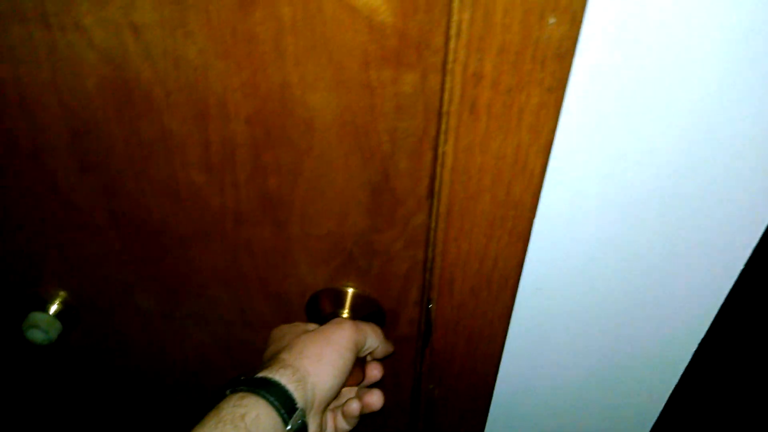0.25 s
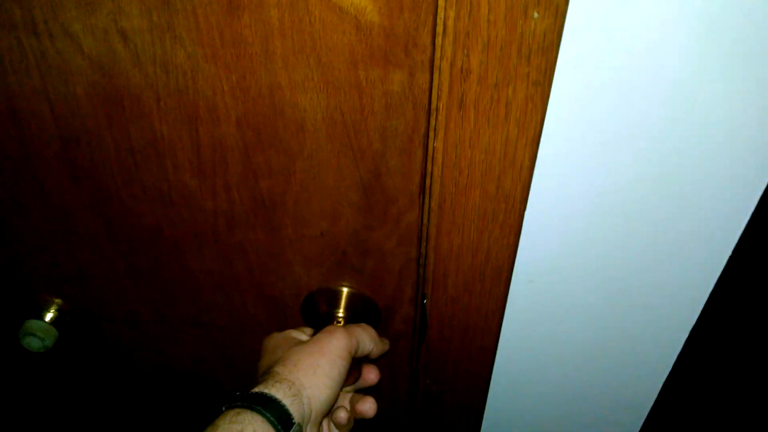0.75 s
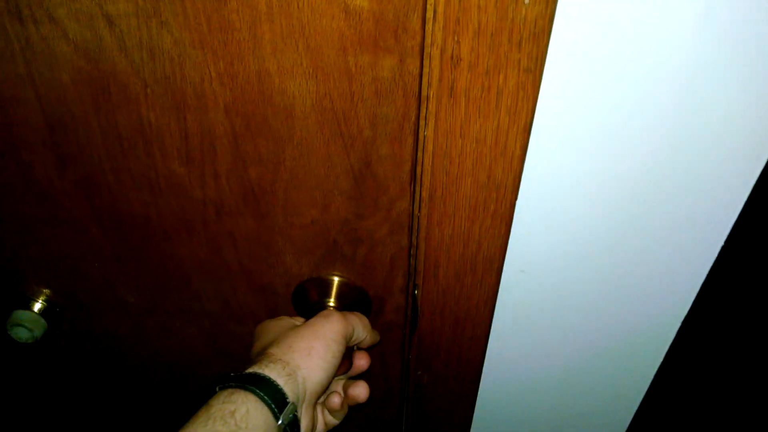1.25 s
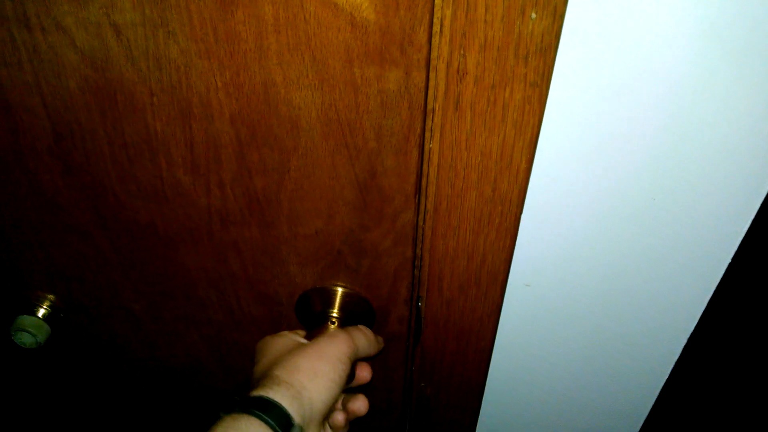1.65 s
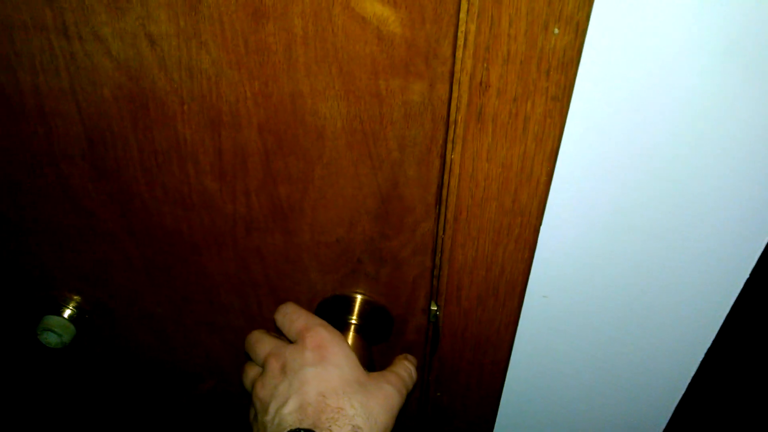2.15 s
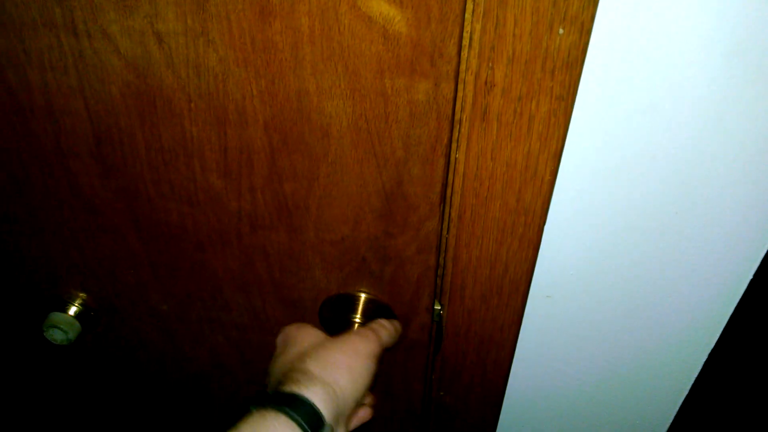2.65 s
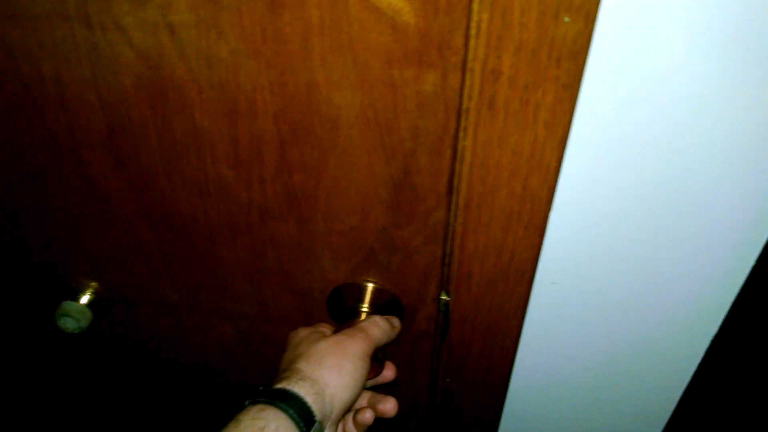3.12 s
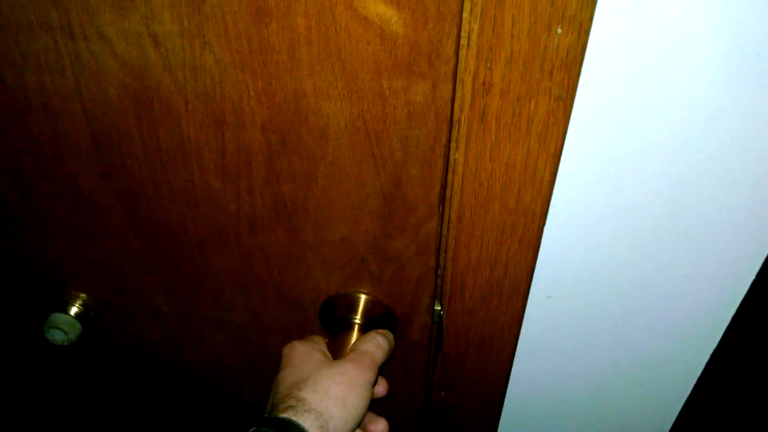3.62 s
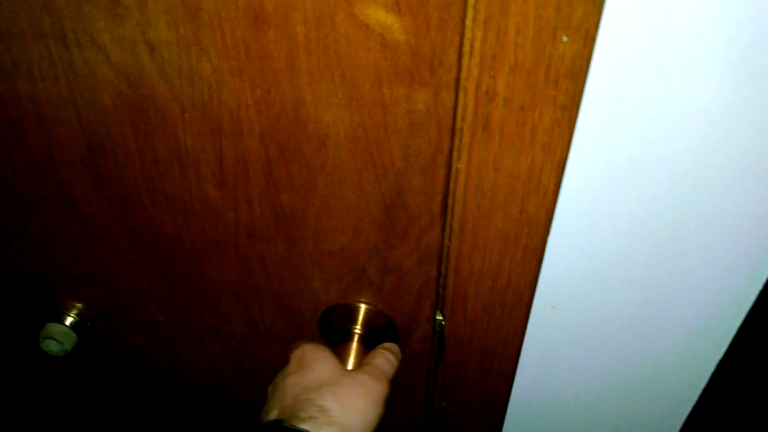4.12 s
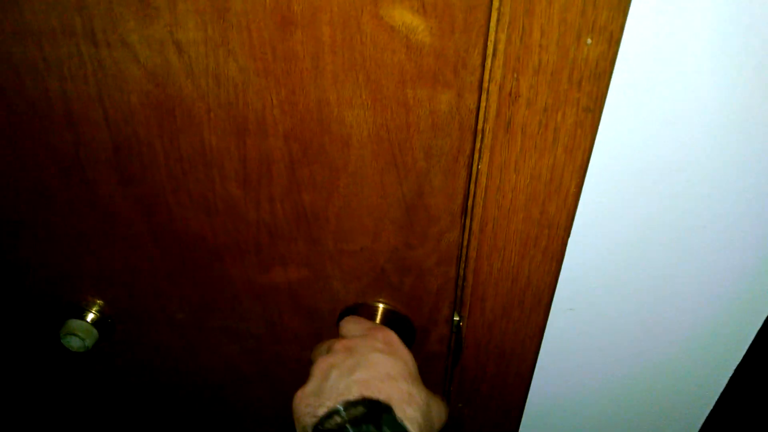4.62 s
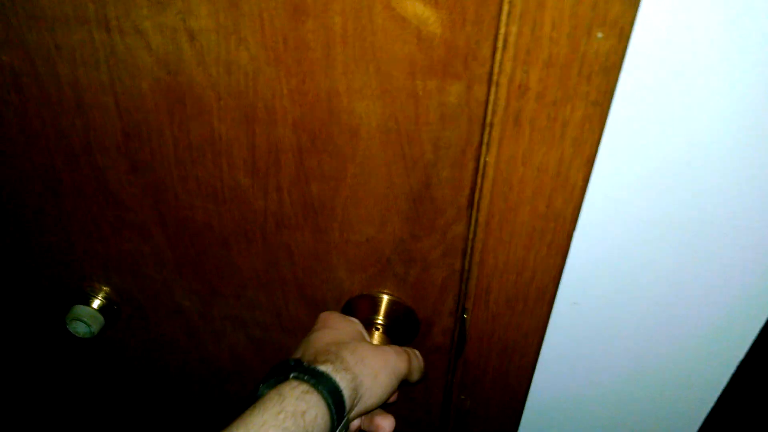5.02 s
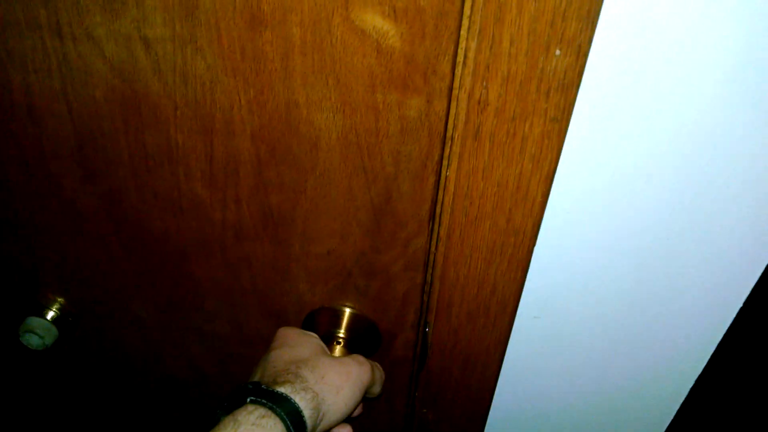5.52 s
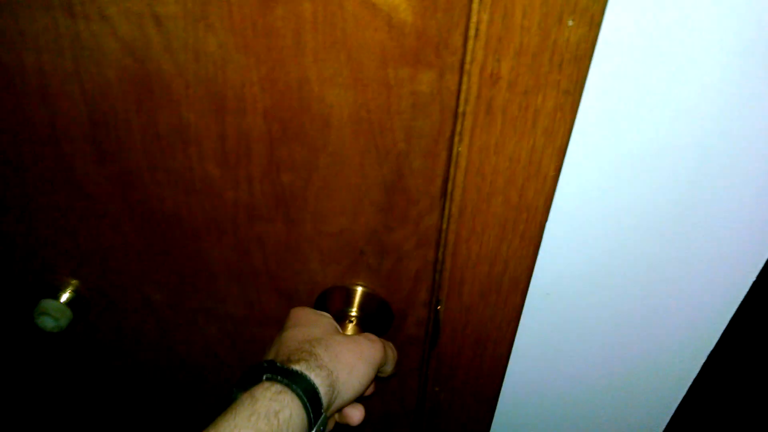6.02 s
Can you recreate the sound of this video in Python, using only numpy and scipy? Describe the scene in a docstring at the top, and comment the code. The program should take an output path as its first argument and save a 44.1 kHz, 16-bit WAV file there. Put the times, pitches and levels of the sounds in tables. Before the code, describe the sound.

A nearby stereo microphone picks up a brass doorknob being turned and pulled. The lock case clacks, the bolt snaps brightly, the loose knob rattles and the wooden door thuds hollowly in its frame. Sparse early contacts lead to a crowded flurry in the middle, then a quieter gap and final heavy tugs. Faint skin rubbing and soft room rumble fill the pauses.

```python
"""A low room rumble and microphone hiss, then a hand twists a brass knob and tugs at a stuck wooden door.
Rumble, hiss and skin are shaped stereo noise. Lone ticks sound the knob only; every other contact mixes
leaf, veneer, lock case, bolt and knob: filtered blows with echoes and chatter, plus decaying sine modes.
Tugs also drive the bolt onto the strike plate, and the latch spring twangs as decaying sines."""
import sys
import numpy as np
from scipy import signal
from scipy.fft import rfft, irfft, next_fast_len
from scipy.io import wavfile
from scipy.ndimage import map_coordinates

SR = 44100
rng = np.random.default_rng(int(sys.argv[2]) if len(sys.argv) > 2 else 0)


def to_wav(sig):
    """Store sig (one row per channel, or 1-D mono) as 16-bit WAV at the path in sys.argv[1].

    Samples outside -1..1 are clipped; the rate is SR.
    """
    pcm = np.clip(np.atleast_2d(sig), -1, 1) * 32767
    pcm = np.round(pcm).astype(np.int16)
    wavfile.write(sys.argv[1], SR, pcm.T)  # frames by channels


N = 276506  # samples in the scene
T_S = np.arange(int(.5 * SR)) / SR  # time axis of one contact
ONSET = int(.02 * SR)  # samples in the onset of a blow


def amp(db):
    """Decibels to amplitude."""
    return 10 ** (np.asarray(db) / 20)


def unit(x):
    """Scale to rms 1."""
    return x / np.sqrt(np.mean(x ** 2) + 1e-20)


def struck(x):
    """Scale a blow to rms 1 over its onset."""
    return x / np.sqrt(np.mean(x[..., :ONSET] ** 2) + 1e-20)


def along(points, hz):
    """Interpolate (Hz, value) points on a log frequency axis."""
    point_hz, values = np.transpose(points)
    return np.interp(np.log(hz + 1), np.log(point_hz + 1), values)


def wobble(rate_hz):
    """Smooth random curve with rate_hz knots a second."""
    knots = rng.standard_normal(int(N * rate_hz / SR) + 4)
    return map_coordinates(knots, [np.arange(N) * rate_hz / SR])


def filtered(x, response):
    """Multiply the zero-padded spectrum of x by a response of frequency."""
    n = x.shape[-1]
    m = 2 * next_fast_len(n // 2 + 4096)
    return irfft(rfft(x, m) * response(np.fft.rfftfreq(m, 1 / SR)), m)[..., :n]


def body(spectrum):
    """Minimum-phase response with this magnitude, by folding the cepstrum."""
    def response(hz):
        cepstrum = irfft(np.log(amp(along(spectrum, hz))))
        half = len(cepstrum) // 2
        folded = np.r_[cepstrum[0], 2 * cepstrum[1:half]]
        return np.exp(rfft(folded, 2 * half))
    return response


def resonances(modes):
    """Sum of second-order band-pass resonances with alternating signs."""
    def response(hz):
        total = 0
        for k, (centre_hz, width_hz, db) in enumerate(modes):
            loss = 1j * hz * width_hz
            total = total + (-1) ** k * amp(db) * loss / (centre_hz ** 2 - hz ** 2 + loss)
        return total
    return response


# stereo width: (frequency [Hz], side minus mid [dB], before apart_db)
STEREO_WIDTH = [(25, -5.5), (75, 3.5), (150, -5.5), (300, -7.5), (600, -10.5), (2000, -17), (10000, -6)]


def pair(count, apart_db):
    """Stereo noise whose side-to-mid ratio varies with frequency."""
    mid, side = rng.standard_normal((2, count))
    side = filtered(side, lambda hz: amp(along(STEREO_WIDTH, hz) + apart_db))
    return unit(np.array([mid + side, mid - side]))


def ringing(modes, spread_db):
    """Decaying sine modes with random strength, sign, slight detuning and slight channel imbalance."""
    hz, db, t60_s = np.transpose(modes)[:, :, None]
    hz = hz * (1 + .011 * rng.standard_normal(hz.shape))  # the grip detunes them
    strength_db = db + spread_db * rng.standard_normal(hz.shape)
    level_db = strength_db + 0.4 * rng.standard_normal((2, len(hz), 1))
    signs = rng.choice([-1, 1], hz.shape)
    waves = signs * amp(-60 * T_S / t60_s) * np.sin(2 * np.pi * hz * T_S)
    attack = 1 - np.exp(-T_S * hz.min())
    ring = amp(level_db[..., 0]) @ waves * attack
    return ring / np.sqrt(np.mean(ring[:, :3 * ONSET] ** 2))


def add(track, s, sound):
    """Mix a sound in at time s."""
    start = round(s * SR)
    track[:, start:start + len(T_S)] += sound[:, :max(N - start, 0)]


# floor noise: (frequency [Hz], relative level [dB])
FLOOR_SPECTRUM = [(20, -6), (50, -3), (78, 0.5), (112, -13.5), (160, -3), (330, -6.5), (600, -11),
                  (1000, -21), (1700, -26.5), (3000, -31), (7000, -31.5), (11000, -31), (14500, -26.5),
                  (15500, -32)]
# room standing waves: (frequency [Hz], width [Hz], relative level [dB])
ROOM_MODES = [(69.4, 12.6, 1), (154, 9.2, 2), (173, 5.5, 4), (216.4, 3.8, -13.5), (315, 29, -4),
              (377.7, 23, -1.5)]
# rumble swell, taken relative to its median: (time [s], level [dB])
RUMBLE_SWELL = [(0.0, -49), (0.77, -53.5), (4.8, -48.5), (4.98, -52.5), (6.13, -49.5), (6.27, -53)]


def background():
    """Wavering rumble coloured by the room's standing waves, under steady microphone hiss."""
    floor = amp(-47.0) * unit(filtered(pair(N, apart_db=3), body(FLOOR_SPECTRUM)))
    rumble = filtered(floor, lambda hz: 1 / (1 + (hz / 1200) ** 4))
    hiss = floor - rumble
    drone = amp(-54.5) * unit(filtered(pair(N, apart_db=2.0), resonances(ROOM_MODES)))
    s, db = np.transpose(RUMBLE_SWELL)
    swell_db = np.interp(np.arange(N) / SR, s, db - np.median(db)) + 0.54 * wobble(6.1)
    return amp(swell_db) * (rumble + drone) + hiss


# first echoes: (delay [s], level [dB])
WALL_ECHOES = [(.0024, -21.5), (.0057, -18.5), (.0083, -17), (0.017, -13.5)]
# decay of door and frame, before damping: (frequency [Hz], t60 [s])
NEAR_T60 = [(100, 0.64), (400, 0.24), (1400, 0.16), (3500, 0.13), (12000, 0.054)]
# decay of the room: (frequency [Hz], t60 [s])
ROOM_T60 = [(100, 0.94), (500, 0.84), (2000, 0.53), (5000, 0.85), (12000, 0.32)]


def strike(blow_db, room_db, chatter_db, damping):
    """Direct blow and first echoes, then uneven chatter in the frame and the room's answer."""
    blow = np.zeros(len(T_S))
    blow[0] = 1
    for delay_s, db in WALL_ECHOES:
        blow[int(abs(delay_s + rng.normal(0, .0002)) * SR)] += amp(db)
    hz, frame_s, noise = signal.stft(pair(len(T_S), apart_db=3.0), SR, nperseg=256)
    near = amp(-60 * frame_s / along(NEAR_T60, hz)[:, None]) ** damping
    room = amp(room_db - 60 * frame_s / along(ROOM_T60, hz)[:, None])
    scatter = signal.istft(noise * np.hypot(near, room), SR, nperseg=256)[1][:, :len(T_S)]
    # loose parts bounce: early sound comes in clumps about 1 ms long
    knots_s = T_S[::48]
    clumps = np.interp(T_S, knots_s, rng.standard_normal(len(knots_s)))
    scatter = scatter * amp(chatter_db * clumps * np.exp(-T_S / 0.045))
    scatter = scatter * (1 - np.exp(-T_S / 0.00052))
    return amp(blow_db) * blow + struck(scatter) / np.sqrt(ONSET)


# knob colour: (frequency [Hz], relative level [dB])
KNOB_SPECTRUM = [(3300, -27), (4700, -6.5), (5400, -5), (6400, -7.5), (7600, -7), (9200, -4.5), (10400, -7),
                 (12000, 3.5), (13000, -13), (14200, 1.5), (15300, -15)]
# brass knob modes: (frequency [Hz], relative level [dB], t60 [s])
KNOB_MODES = [(3400, -2, 0.31), (4060, 0.5, 0.18), (6870, -28, 0.13), (8830, -2, 0.16), (11330, 2, .08),
              (11800, -3, 0.132), (13800, -4, 0.079)]


def knob_tick(blow_db):
    """Thin brass shell ticks on its spindle and rings briefly."""
    hit = strike(blow_db - 16, room_db=-15.0, chatter_db=6.5, damping=0.63)
    tick = struck(filtered(hit, body(KNOB_SPECTRUM)))
    return struck(tick + amp(-15.0) * ringing(KNOB_MODES, spread_db=4))


# case colour: (frequency [Hz], relative level [dB])
CASE_SPECTRUM = [(350, -32.5), (620, -1), (740, -0.5), (860, -3), (980, -1.5), (1130, 1.5), (1300, 0),
                 (1550, 2.5), (1850, -1.5), (2150, -4.5), (2450, -16), (3300, -37.5)]
# lock case modes: (frequency [Hz], relative level [dB], t60 [s])
CASE_MODES = [(610, -9.5, 0.41), (719, -6, 0.076), (870, 2, 0.11), (956, -3.5, 0.26), (1110, -0.5, 0.075),
              (1130, 1, 0.1), (1272, 1.5, 0.18), (1373, -5.5, 0.23), (1522, 2, 0.062), (1807, 6.5, 0.051),
              (1984, 5, 0.032), (2200, 0, 0.062), (2680, -3, 0.21)]


def case_knock(pitch_hz, blow_db):
    """Lock case clacks in its pocket; the point of contact favours modes near one pitch."""
    hit = strike(blow_db - .5, room_db=-15.0, chatter_db=-1.0, damping=0.9)
    knock = struck(filtered(hit, body(CASE_SPECTRUM)))
    modes = []
    for hz, db, t60_s in CASE_MODES:
        favour = np.exp(-(np.log(hz / pitch_hz) / .06) ** 2)
        modes.append((hz, db + 11 * favour, t60_s))
    return struck(knock + amp(-5) * ringing(modes, spread_db=3))


# veneer colour: (frequency [Hz], relative level [dB])
VENEER_SPECTRUM = [(120, -23), (290, -5.5), (380, -4.5), (530, -2.5), (680, -5.5), (1300, -46.5)]
# modes of the veneer around the lock: (frequency [Hz], relative level [dB], t60 [s])
VENEER_MODES = [(307.6, -3, 0.31), (340.5, -3.5, 0.27), (386, -4.5, 0.22), (408.3, 0.5, 0.2),
                (501, -4, 0.29), (519.3, 6, 0.17)]


def veneer_knock():
    """Thin wooden skin gives a hollow knock."""
    hit = strike(-0.6, room_db=-21, chatter_db=2.5, damping=1.0)
    knock = struck(filtered(hit, body(VENEER_SPECTRUM)))
    return amp(-0.5) * knock + amp(-7.0) * ringing(VENEER_MODES, spread_db=3.0)


# leaf colour: (frequency [Hz], relative level [dB])
LEAF_SPECTRUM = [(30, -13.5), (80, 0), (112, -6.5), (160, -6.5), (250, 1.5), (340, -2), (700, -58.5)]
# door leaf modes: (frequency [Hz], relative level [dB], t60 [s])
LEAF_MODES = [(80.7, -9.5, 0.14), (151.4, -6, 0.16), (168.9, -5.5, 0.19), (223.7, -5.5, 0.19),
              (246, -12, 0.16)]


def leaf_boom():
    """Leaf booms against its frame; the whole door sways on its hinges near 30 Hz."""
    hit = strike(0.94, room_db=-39.0, chatter_db=8.0, damping=1.0)
    panel = struck(filtered(hit, body(LEAF_SPECTRUM)))
    modes = ringing(LEAF_MODES, spread_db=1.5)
    sway_hz = 30 * (1 + .1 * rng.normal())
    sway = np.sin(2 * np.pi * sway_hz * T_S) * (1 - np.exp(-T_S / 0.016)) * amp(-60 * T_S / 0.8)
    return amp(-1.5) * panel + amp(-3.5) * modes + amp(-3) * sway


# bolt resonances: (frequency [Hz], width [Hz], relative level [dB])
BOLT_RESONANCES = [(2563, 400, 7.5), (3635, 920, 7), (3900, 340, -27), (4330, 1200, -24), (9100, 800, 9),
                   (14370, 510, -1)]
# modes of the jamb behind the strike plate: (frequency [Hz], relative level [dB], t60 [s])
JAMB_MODES = [(365.3, -16.5, 0.34), (394.4, 1, 0.11)]
BOLT_ROOM_DB = -28  # buried in the door, so the room barely answers


def bolt_ring(blow_db):
    """Sprung bolt rings for a few cycles and shakes the jamb; stronger first blows reach its high modes."""
    # (frequency [Hz], level [dB])
    contact_spectrum = [(800, -32), (2400, 17.5), (4600, 5.0), (7500, -7.0 + 0.59 * blow_db)]
    hit = strike(blow_db + 5.0, room_db=BOLT_ROOM_DB, chatter_db=6.0, damping=0.89)
    crack = filtered(hit, body(contact_spectrum))
    jamb = ringing(JAMB_MODES, spread_db=1.5)
    return struck(filtered(crack, resonances(BOLT_RESONANCES))) + amp(-15.5) * jamb


def contact(shares_db, pitch_hz):
    """One contact sounds leaf, veneer, case, bolt and knob together."""
    leaf_db, veneer_db, case_db, bolt_db, knob_db, blow_db = shares_db
    wood = amp(leaf_db) * leaf_boom() + amp(veneer_db) * veneer_knock()
    metal = amp(case_db) * case_knock(pitch_hz, blow_db) + amp(bolt_db) * bolt_ring(blow_db)
    return wood + metal + amp(knob_db) * knob_tick(blow_db)


# knob alone ticks under the fingers: (time [s], level [dB])
TICKS = [(0.0647, -54.5), (0.754, -59), (1.763, -57.5), (2.762, -59.5), (3.092, -52.5), (4.2954, -53),
         (5.7601, -58)]
TICK_BLOW_DB = -4
# the four contact tables: (time [s], strength [dB], hardness [dB], favoured case pitch [Hz])
# spindle takes up its slack and clacks in the lock case
CLACKS = [(.221, -48, -8.5, 1370), (.2553, -35, 2.5, 1530), (1.2269, -46.5, -13, 1240),
          (1.317, -40.5, -5.5, 1240), (1.929, -30, -10, 1090), (2.8815, -50, 5, 880),
          (3.012, -39, -1.5, 880), (3.0472, -41.5, -4, 1450), (3.71, -42.5, 4, 1430), (3.727, -42, 9, 1970),
          (3.8124, -31.5, 8.5, 1060), (4.0835, -46.5, -9, 1410), (4.1707, -35.5, 3, 1170),
          (4.2505, -35, 7.5, 1330), (4.487, -36, 1, 1110), (4.7329, -44, 13.5, 1950), (4.804, -42, 0, 1120),
          (4.82, -36.5, -0.5, 1240), (4.868, -36.5, -11, 860), (6.063, -47, -1, 1420),
          (6.1546, -33, -10, 1320)]
# loose knob rattles on its spindle
RATTLES = [(.2645, -48, -2, 1250), (3.5012, -42, -2.5, 870), (4.3151, -32, -4.5, 880),
           (4.497, -39.5, 11, 1560), (4.502, -29.5, 0.5, 1540), (4.565, -40.5, -7, 2000),
           (4.5728, -37.5, 2.5, 1140)]
# tugged door thuds against its latch
THUDS = [(0.2972, -37, 4.5, 1330), (0.8277, -44, 6.5, 1220), (1.2713, -32.5, 5.5, 1100),
         (1.3351, -43, -4, 1270), (2.036, -50, 1, 1270), (3.371, -60, -27, 800), (3.5241, -35, 3.5, 1100),
         (3.989, -55.5, -15.5, 800), (4.134, -39, -11.5, 950), (5.18, -52.5, -3, 870),
         (5.454, -54, -1, 880), (5.4996, -33, -6.5, 960), (6.079, -47, -3, 1140), (6.1236, -28.5, -4, 1020)]
# sprung bolt snaps against its stop
SNAPS = [(1.8729, -50.5, 1.5, 2080), (1.8968, -26, 11, 1920), (3.1125, -26.5, -1, 1120),
         (3.5608, -41.5, 0.5, 1270), (3.7411, -32.5, 2, 1510), (4.114, -33, -3, 1500),
         (4.1961, -33.5, 2, 1190), (4.5959, -35.5, 2.5, 1210), (4.6323, -37, -2, 1950),
         (4.8559, -30, -1, 1990)]
# part levels at zero hardness: (leaf [dB], veneer [dB], case [dB], bolt [dB], knob [dB], first blow [dB])
CLACK_DB = (-16.5, -7, -1.67, -16, -19.5, -11)
RATTLE_DB = (-23.5, -9, -0.2, -6.5, -3.5, -2)
THUD_DB = (0, -2.5, -0.97, -17.5, -29.5, -11)
SNAP_DB = (-15, -6.5, -1.86, -5.5, -11.5, -2)
# change of those levels with hardness: (leaf, veneer, case, bolt, knob, first blow), all [dB per dB]
CLACK_TILT = (-.1, -0.28, 0.031, 0.82, 0.5, -0.15)
RATTLE_TILT = (1.3, -0.12, -0.16, 0.95, 1.1, 0.29)
THUD_TILT = (-0.66, -0.41, -0.022, -0.58, 2.1, 0.99)
SNAP_TILT = (0.11, -0.16, 0.049, 1.14, 0.71, .3)


def lock():
    """Lone knob ticks, and contacts whose mix of parts depends on kind and hardness."""
    out = np.zeros((2, N))
    for s, db in TICKS:
        add(out, s, amp(db) * knob_tick(TICK_BLOW_DB))
    kinds = [(CLACKS, CLACK_DB, CLACK_TILT), (RATTLES, RATTLE_DB, RATTLE_TILT),
             (THUDS, THUD_DB, THUD_TILT), (SNAPS, SNAP_DB, SNAP_TILT)]
    for events, base_db, tilt in kinds:
        for s, strength_db, hardness_db, pitch_hz in events:
            shares_db = np.array(base_db) + hardness_db * np.array(tilt)
            add(out, s, amp(strength_db) * contact(shares_db, pitch_hz))
    return out


SLAM_DB, SLAM_BLOW_DB = -36.5, -12.5  # level in the strongest tug; first blow
SLAM_DB_PER_DB = 2.66  # loss per dB of a weaker tug


def strike_plate():
    """Each tug drives the bolt onto the strike plate; weaker tugs fade out steeply."""
    out = np.zeros((2, N))
    strongest_db = max(row[1] for row in THUDS)
    for s, strength_db, _, _ in THUDS:
        slam_db = SLAM_DB + SLAM_DB_PER_DB * (strength_db - strongest_db)
        add(out, s, amp(slam_db) * bolt_ring(SLAM_BLOW_DB))
    return out


# skin sliding on the brass: (time [s], 1/e half-length [s], level before flutter [dB])
SLIDES = [(1.445, 0.072, -70), (3.02, .04, -65.5), (3.42, .07, -57.5), (4.773, .05, -57),
          (5.87, 0.021, -64)]
# skin colour: (frequency [Hz], relative level [dB])
SKIN_SPECTRUM = [(3000, -36), (9000, -15.5), (13000, -11), (14300, 1), (15500, -19)]


def hand():
    """Skin hisses faintly as the grip shifts: fluttering noise in Gaussian swells."""
    t = np.arange(N) / SR
    grip = np.zeros(N)
    for s, length_s, db in SLIDES:
        grip += amp(db) * np.exp(-((t - s) / length_s) ** 2)
    flutter = amp(2 * wobble(60))
    return grip * flutter * unit(filtered(pair(N, apart_db=-1.0), body(SKIN_SPECTRUM)))


# latch spring twangs: (time [s], level before attack [dB], pitch [Hz], t60 [s])
TWANGS = [(4.1971, -36, 1245, 0.44), (4.2545, -21, 1427, 0.053)]
TWANG_ATTACK_S = 0.0012


def spring():
    """Latch spring rings as a decaying sine, one fixed pitch per twang."""
    out = np.zeros((2, N))
    for s, db, hz, t60_s in TWANGS:
        envelope = amp(db - 60 * T_S / t60_s) * (1 - np.exp(-T_S / TWANG_ATTACK_S))
        ring = envelope * np.sin(2 * np.pi * hz * T_S)
        add(out, s, ring[None])
    return out


def scene():
    """Room, lock, hand and spring together."""
    return background() + lock() + strike_plate() + hand() + spring()


# phase by which the right channel leads: (frequency [Hz], phase [rad])
RIGHT_LEAD = [(0, 0), (1400, 0), (2000, 1), (2550, 3.1), (3200, 6.1), (4300, 6.3), (5150, 3.2), (6100, 6.1),
              (6800, 6.4), (7700, 9.4), (9200, 12.6), (15400, 28.5)]
BAND_LIMIT_HZ = 15550


def record(dry):
    """Channels part in phase towards the treble, highest peaks are rounded, the band is limited."""
    def phase_split(hz):
        lead_rad = np.interp(hz, *np.transpose(RIGHT_LEAD))
        return np.exp(.5j * np.outer([-1, 1], lead_rad))
    wide = filtered(dry, phase_split) * amp([[-.6], [.6]])  # left, right gain in dB
    rounded = wide / (1 + np.abs(wide / .95) ** 6) ** (1 / 6)
    return filtered(rounded, lambda hz: hz < BAND_LIMIT_HZ)


dry = scene()
out = record(dry)
to_wav(out)
```